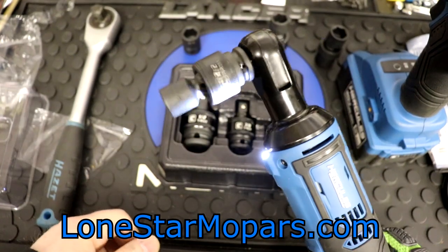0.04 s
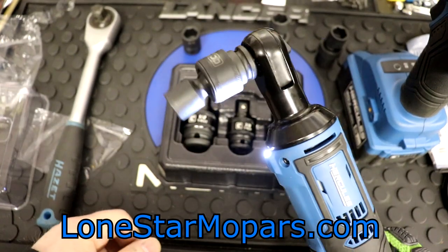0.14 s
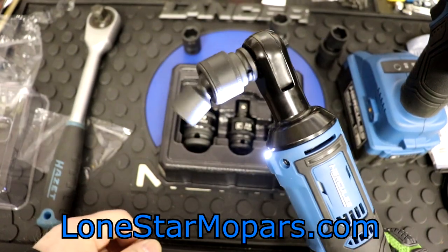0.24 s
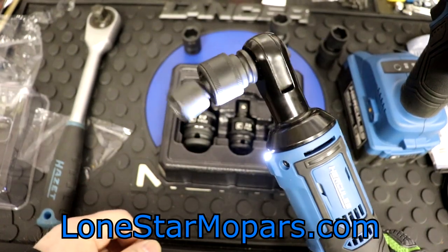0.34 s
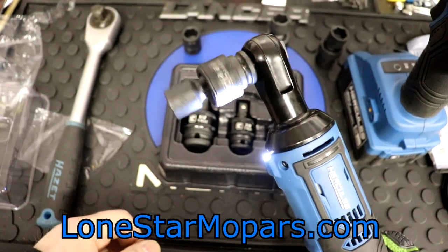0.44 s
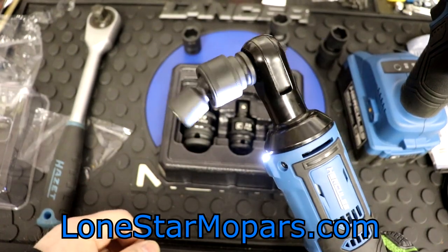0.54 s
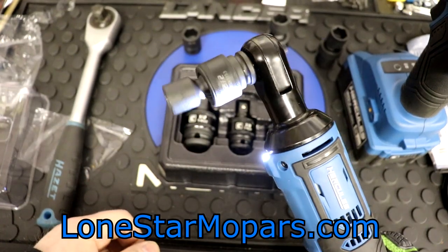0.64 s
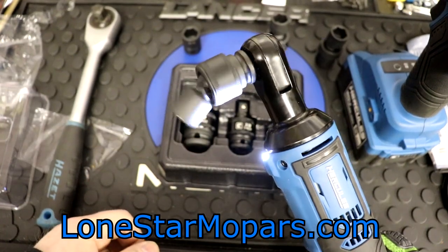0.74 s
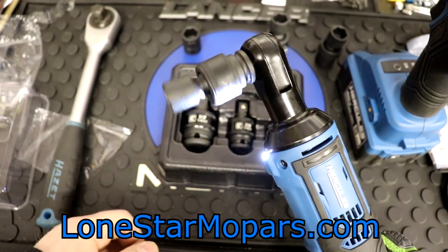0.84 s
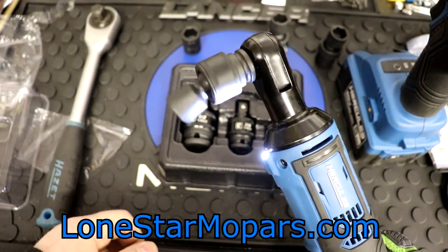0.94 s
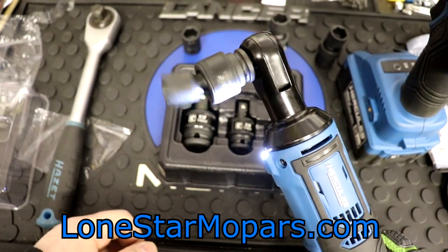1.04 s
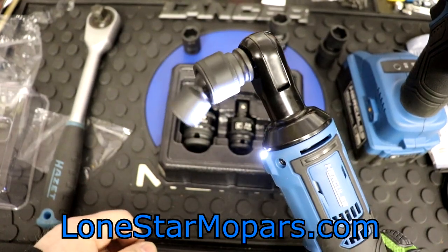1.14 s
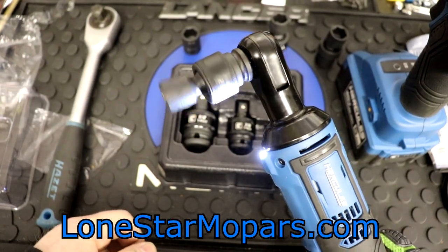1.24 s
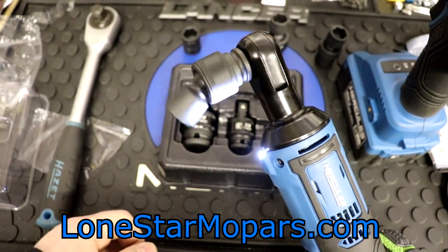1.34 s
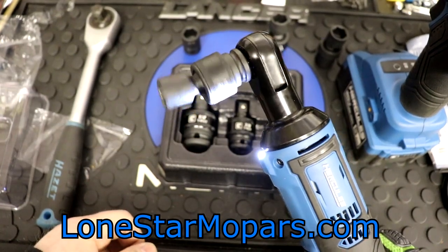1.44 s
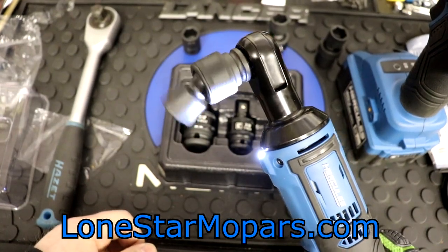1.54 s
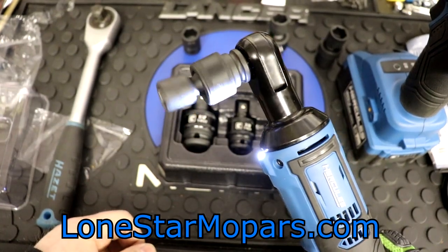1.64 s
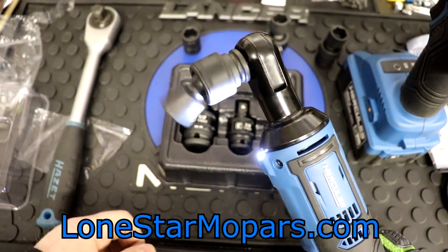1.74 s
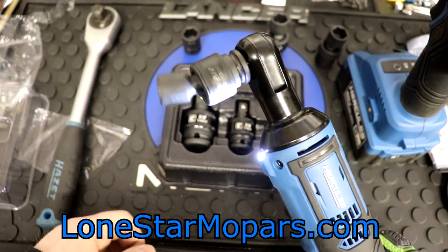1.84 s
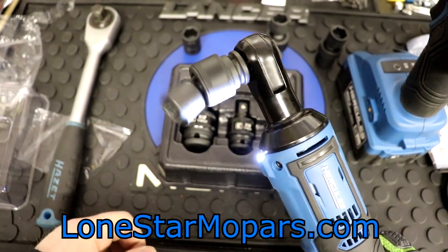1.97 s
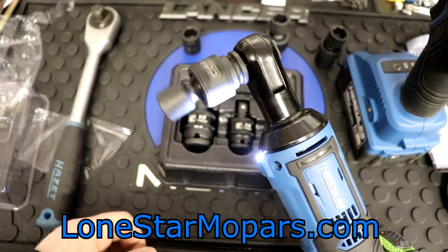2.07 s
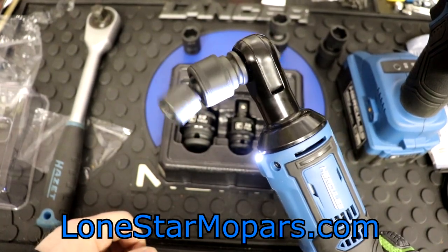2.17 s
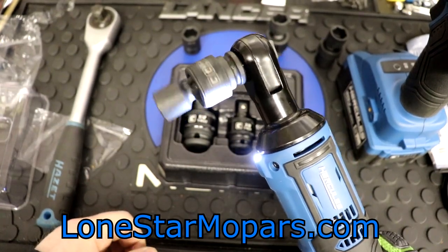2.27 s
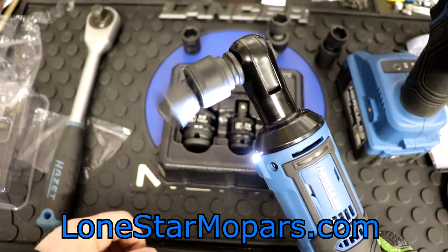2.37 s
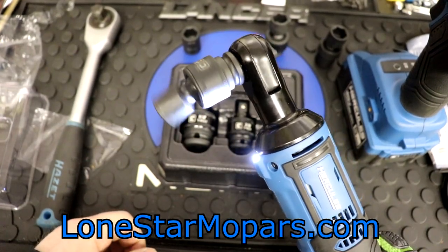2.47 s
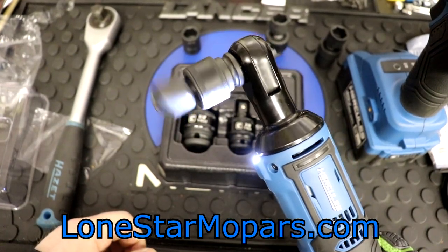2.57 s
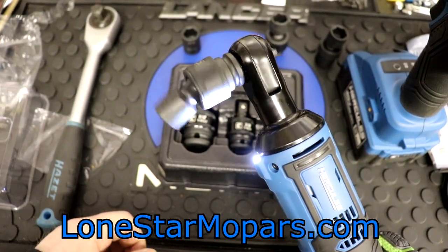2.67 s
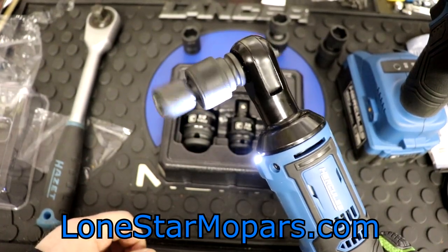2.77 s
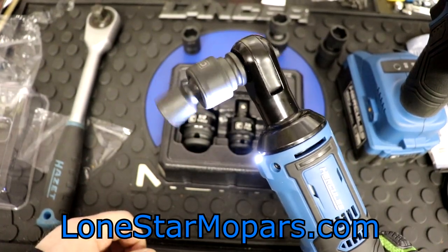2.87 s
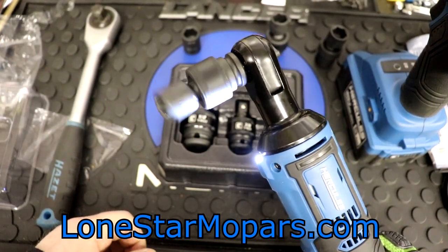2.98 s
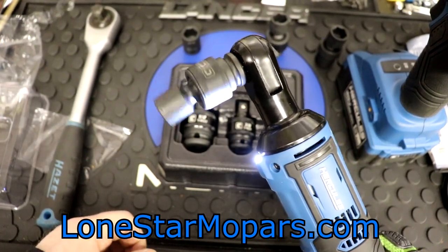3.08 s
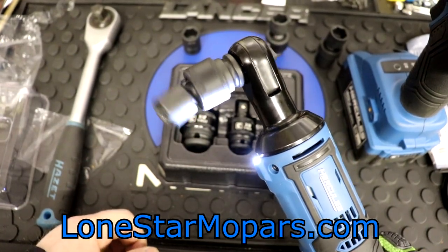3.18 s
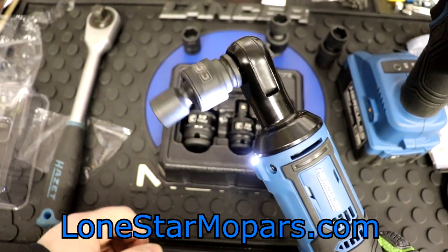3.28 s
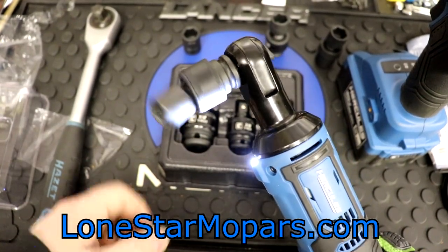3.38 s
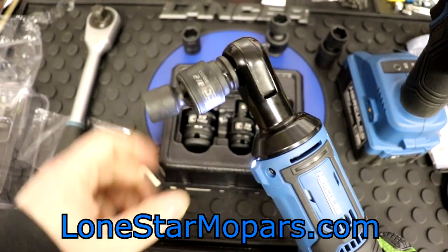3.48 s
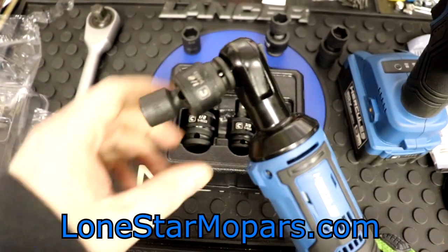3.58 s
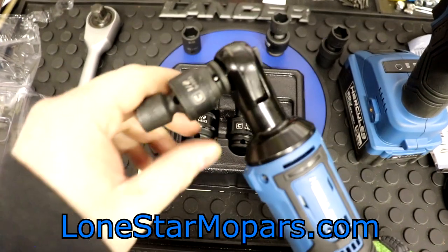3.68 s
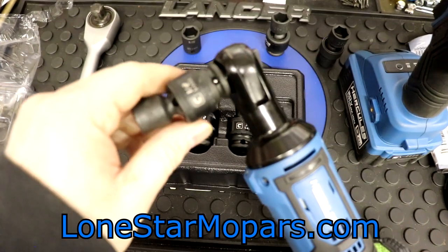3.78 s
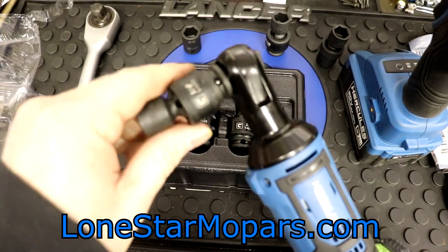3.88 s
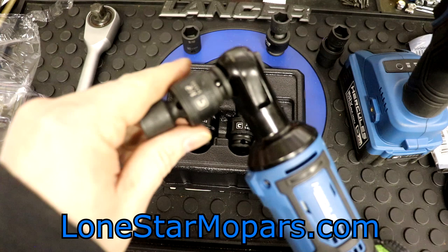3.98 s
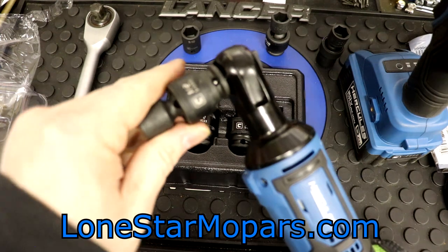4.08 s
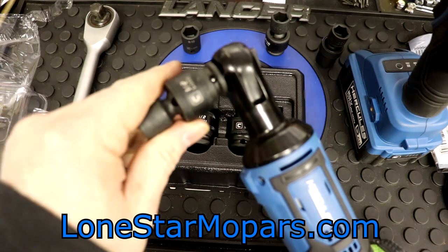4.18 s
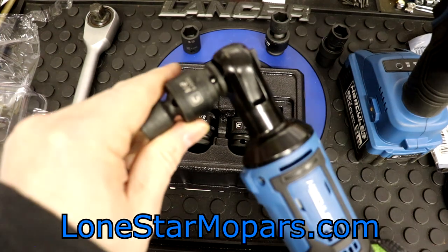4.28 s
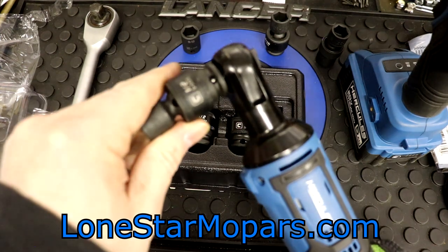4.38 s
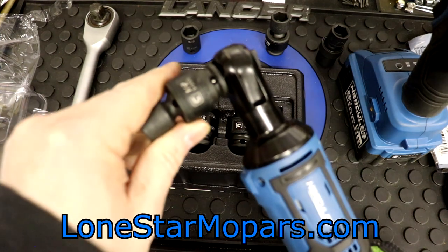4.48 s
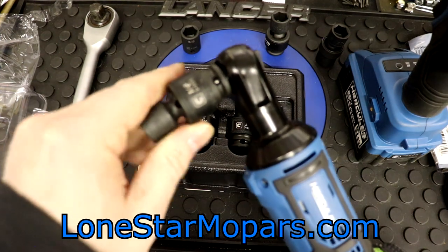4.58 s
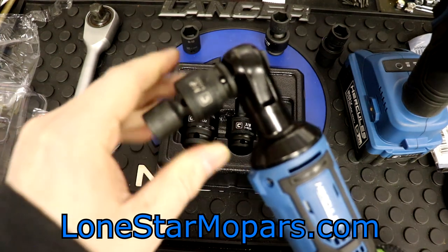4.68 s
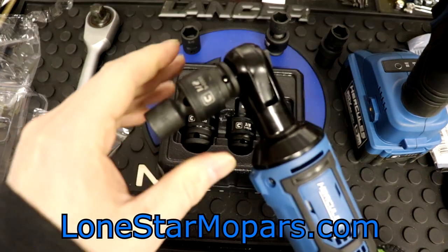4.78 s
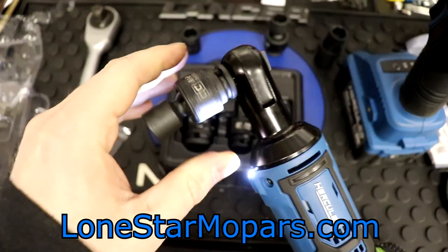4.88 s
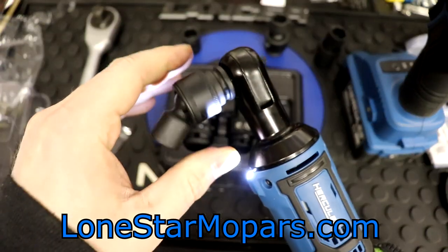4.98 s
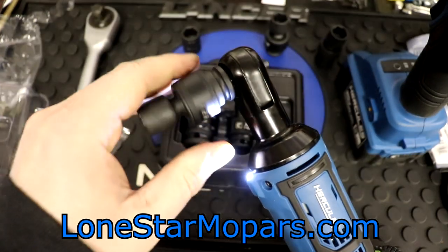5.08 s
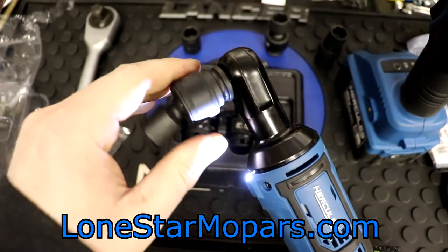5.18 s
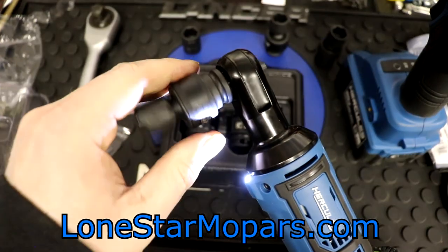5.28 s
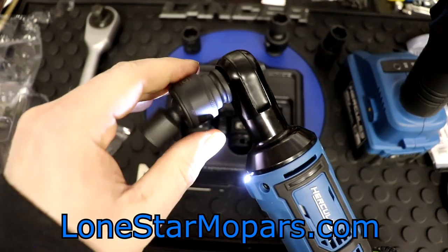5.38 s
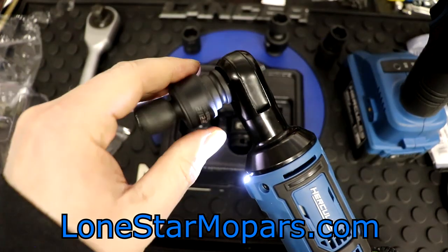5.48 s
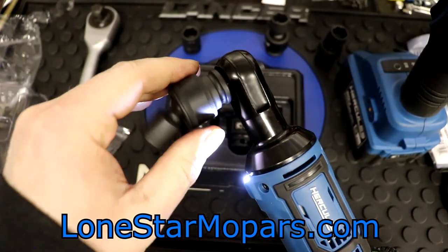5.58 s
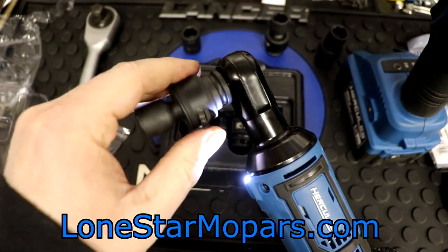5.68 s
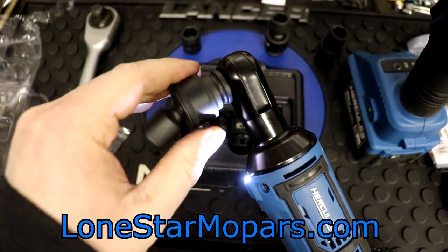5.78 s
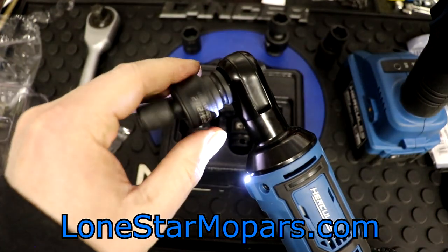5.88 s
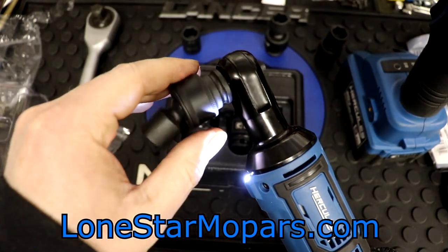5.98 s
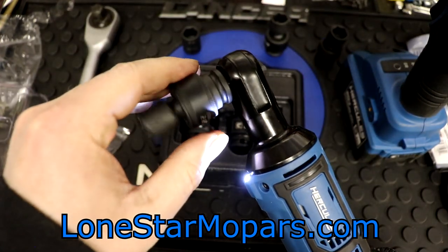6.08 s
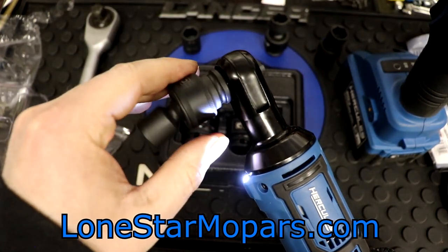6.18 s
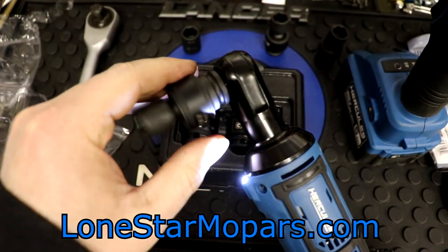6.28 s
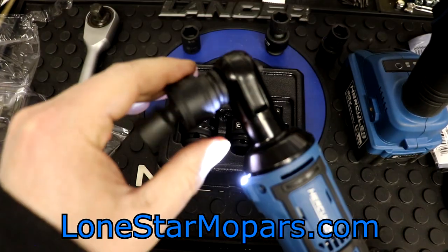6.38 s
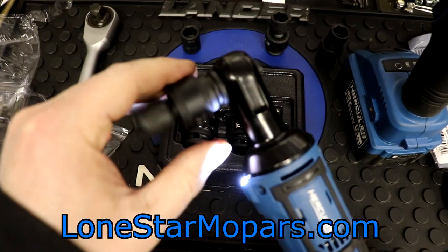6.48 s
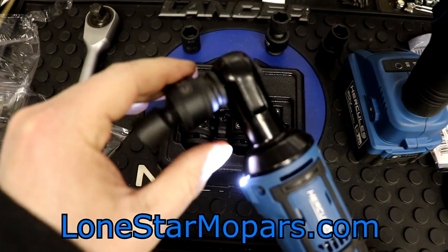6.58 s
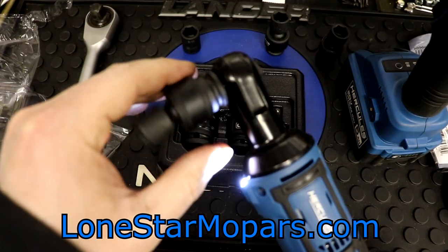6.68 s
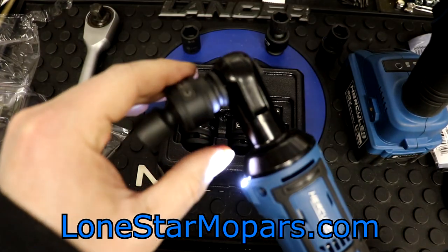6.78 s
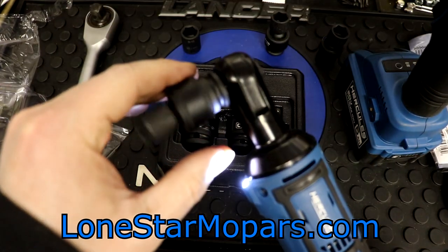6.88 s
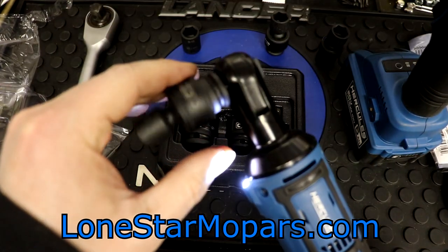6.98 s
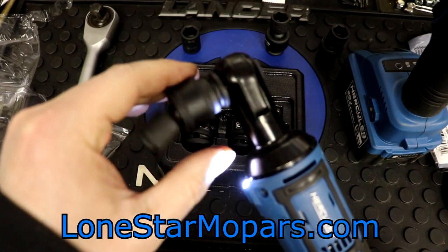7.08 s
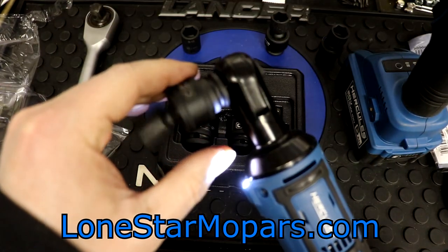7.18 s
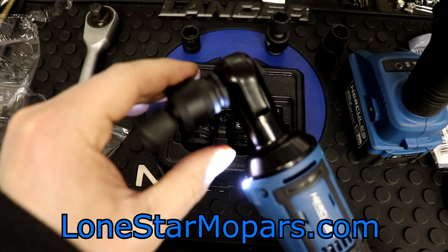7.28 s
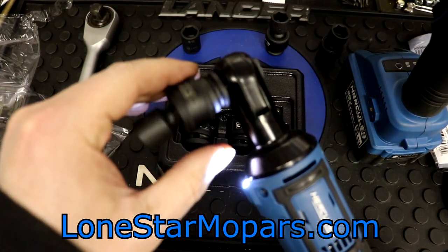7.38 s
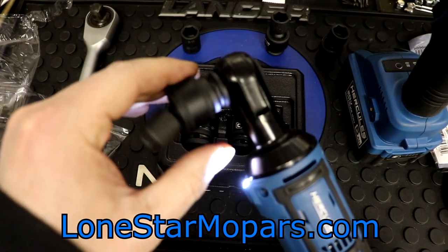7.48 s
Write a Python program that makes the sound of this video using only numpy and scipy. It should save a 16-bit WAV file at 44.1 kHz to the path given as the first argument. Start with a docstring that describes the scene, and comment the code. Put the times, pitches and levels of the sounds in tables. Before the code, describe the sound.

Close up, an electric ratchet whirs and chatters, pauses for a finger rustle and a switch click, then restarts.

```python
"""Above a workbench, close to the microphone, a cordless ratchet spins a socket freely: part throttle,
then full speed, a stop, a rustle of fingers, a flick of the direction lever, and full speed again.
Each crank turn swings the yoke: it knocks, the gears rattle and the pawl ticks over its teeth.
The motor drive whistles at part throttle. Now and then a sharp tick comes with a thump in the
microphone, and a limiter ducks the loudest peaks. A quiet room hums behind."""
import sys
import numpy as np
from scipy import signal
from scipy.fft import rfft, irfft, next_fast_len
from scipy.io import wavfile
from scipy.ndimage import uniform_filter1d

SR = 44100
rng = np.random.default_rng(int(sys.argv[2]) if len(sys.argv) > 2 else 0)


def pcm_store(signal):
    """Save signal as 16-bit PCM."""
    levels = np.round(np.clip(np.atleast_2d(signal), -1, 1) * 32767)
    wavfile.write(sys.argv[1], SR, levels.astype(np.int16).T)


N = 332021
TIME = np.arange(N) / SR
FFT_SIZE = next_fast_len(N + SR)
FREQ = np.maximum(np.arange(FFT_SIZE // 2 + 1) * SR / FFT_SIZE, 1)
PART_THROTTLE = .6  # share of full speed

# Microphone thumps, each with a tick: start_s, left_db, right_db (table levels are relative)
MIC_THUMPS = [(1.0727, -26, -3), (1.5, -38, -20.5), (2.078, -40, -22), (2.237, -22, -9),
              (2.263, -29, -15.5), (2.822, -28, -15), (3.033, -21, -3.5), (3.233, -26, -14),
              (5.064, -31, -13), (5.3596, -19, -19.5), (5.505, -26, -13.5), (5.664, -16, -20.5),
              (5.705, -19.5, -18), (6.26, -40, -24), (6.754, -31, -21), (6.9393, -26, -4),
              (7.471, -33, -21.5)]


def from_db(db):
    """Decibels to gain."""
    return 10 ** (np.asarray(db) / 20)


def rms_one(x):
    """Scale to unit power."""
    return x / np.sqrt(np.mean(x ** 2) + 1e-20)


def over_hz(points):
    """Spread a curve over the frequency grid."""
    hz, value = np.transpose(points)
    return np.interp(np.log(FREQ), np.log(hz), value)


def colour(x, spectrum):
    """Minimum-phase EQ with unit mean power gain, from rows of freq_hz, level_db."""
    cepstrum = irfft(np.log(rms_one(from_db(over_hz(spectrum)))), FFT_SIZE)
    cepstrum[1:FFT_SIZE // 2] *= 2
    cepstrum[FFT_SIZE // 2 + 1:] = 0
    return irfft(rfft(x, FFT_SIZE) * np.exp(rfft(cepstrum)), FFT_SIZE)[..., :N]


def pass_band(x, kind, hz, order=2):
    """Butterworth low-pass or high-pass."""
    return signal.sosfilt(signal.butter(order, hz, kind, fs=SR, output="sos"), x)


def stereo_noise():
    """White noise, narrow in the bass and wide in the treble."""
    # Likeness of left and right: freq_hz, correlation
    likeness = [(100, 0.73), (600, 0.94), (1500, 0.61), (3000, 0.61), (6000, 0.18), (10000, 0.13),
                (15000, 0.36)]
    alike = over_hz(likeness)
    mid, side = rfft(rng.standard_normal((2, FFT_SIZE))) * np.sqrt([(1 + alike) / 2, (1 - alike) / 2])
    return irfft([mid + side, mid - side], FFT_SIZE)[:, :N]


def drift(changes_per_s):
    """A smooth random wander."""
    return np.interp(TIME * changes_per_s, np.arange(SR), rng.standard_normal(SR))


def clicks(times, gains):
    """Single-sample kicks at the given times."""
    out = np.zeros(N)
    np.add.at(out, np.clip(np.round(np.asarray(times) * SR).astype(int), 0, N - 1), gains)
    return out


def fade(kicks, decay_s):
    """Every kick starts an exponential decay."""
    return signal.lfilter([1], [1, -np.exp(-1 / (decay_s * SR))], kicks + 1e-18)


def blows(rows, decay_s, gain_db):
    """Hard contacts, each a noise burst that dies at once."""
    times, level_db = np.transpose(rows)
    return fade(clicks(times, from_db(level_db + gain_db)), decay_s) * stereo_noise()


def resonate(x, hz, width_hz):
    """Two-pole resonance with a peak gain of 1."""
    r, w = np.exp(-np.pi * width_hz / SR), 2 * np.pi * hz / SR
    return signal.lfilter(np.array([1, 0, -1]) * (1 - r * r) / 2, [1, -2 * r * np.cos(w), r * r], x)


def modes(x, table):
    """Resonances in parallel, with alternating signs."""
    return sum((-1) ** k * from_db(db) * resonate(x, hz, width)
               for k, (hz, width, db) in enumerate(table))


def ring(kicks, hz, t60_s):
    """Each kick sets a decaying sine ringing."""
    r, w = np.exp(-np.log(1000) / (t60_s * SR)), 2 * np.pi * hz / SR
    return signal.lfilter([0, np.sin(w)], [1, -2 * r * np.cos(w), r * r], kicks + 1e-18)


def motor(spin_up_s=.02, brake_s=.018, surge_s=.12, socket_revs_per_s=4.98):
    """Each trigger pull spins the motor up with a surge of torque; motion is its share of set speed."""
    # Trigger pulls: on_s, squeeze_s, fully_down_s, standstill_s, socket_tight_spot_s, socket_ring_db
    pulls = [(-.5, .335, .503, 3.576, 0.738, -5.5), (4.8839, 4.922, 4.952, 7.7, 5.21, -2)]
    state = np.zeros((5, N))
    for on_s, squeeze_s, down_s, stop_s, tight_s, ring_db in pulls:
        running = (TIME >= on_s) & (TIME < stop_s)
        t = TIME[running]
        throttle = np.interp(t, [squeeze_s, down_s], [PART_THROTTLE, 1])
        motion = (1 - np.exp((on_s - t) / spin_up_s)) * (1 - np.exp((t - stop_s) / brake_s))
        surge = np.exp((on_s - t) / surge_s)
        revs = socket_revs_per_s * (t - tight_s)
        state[:, running] = [throttle, motion, surge, revs, np.full(len(t), ring_db)]
    return state


def wobble(revs, depth_db, peak_rev):
    """The swivel socket runs out of true, so the load swings once a revolution; in dB."""
    return depth_db * np.cos(2 * np.pi * (revs - peak_rev))


def gears(turns, contacts_per_s, spread_db, contact_s, stroke_spread_db, smooth_share):
    """Loose gears and socket chatter in tiny contacts, hardest just after the yoke turns round."""
    # Rattle through one stroke: turn_fraction, level_db
    stroke_shape = [(0, 0), (.06, 2.5), (.18, 2.5), (.28, 1), (.38, 1.5), (.52, -.5), (.68, -3.5),
                    (.95, -4.5), (1, 0)]
    hits = rng.random(N) < contacts_per_s / SR
    force = from_db(spread_db * rng.standard_normal(N).clip(-2, 2))
    grain = rms_one(fade(hits * force, contact_s))
    stroke_db = stroke_spread_db * rng.standard_normal(int(turns[-1]) + 2)
    swing = from_db(np.interp(turns % 1, *np.transpose(stroke_shape)) + stroke_db[turns.astype(int)])
    return rms_one(np.hypot(grain, smooth_share) * swing) * stereo_noise()


def crank_kicks(turns, turn_fraction, jitter_s, spread_db=4.0):
    """One kick each time the crank passes a point in its turn, uneven in timing and force."""
    times = TIME[1:][np.diff(np.floor(turns - turn_fraction)) > 0]
    late, strength = rng.standard_normal((len(times), 2)).clip(-2, 2).T
    return clicks(times + jitter_s * late, from_db(spread_db * strength))


def yoke(turns, force):
    """The yoke takes up its play with one short knock a stroke, and a few hard clacks."""
    # Hard clacks of the yoke: start_s, level_db
    clacks = [(.0275, -14.5), (.0425, -15), (.2435, -15), (.266, -16), (.411, -14.5), (4.9255, -15)]
    kicks = crank_kicks(turns, turn_fraction=.033, jitter_s=.0004)
    knocks = rms_one(fade(kicks, decay_s=.0058)) * stereo_noise()
    return force * knocks + blows(clacks, decay_s=.0043, gain_db=9.5)


def head(knocks, chatter):
    """Knocks and chatter ring through the housing and head."""
    # Resonances of housing and head: pitch_hz, width_hz, level_db
    head_modes = [(522, 59, -5.5), (616, 202, -11), (1680, 480, -13.5), (2430, 184, -3), (2776, 127, -7),
                  (3240, 205, -2), (4010, 230, -6.5), (4586, 320, -3)]
    return modes(from_db(2.5) * knocks + from_db(6) * chatter, head_modes)


def socket(knocks, chatter):
    """The loose socket jumps on its square drive and rings, mostly at the knocks."""
    # Ring of the socket: pitch_hz, width_hz, level_db
    socket_modes = [(2634, 170, -0.5), (3120, 160, -10.5), (5760, 350, -7.5)]
    return modes(from_db(9) * knocks + from_db(5) * chatter, socket_modes)


def rasp(turns, force):
    """Finer gear contacts blur into a bright rasp."""
    # Tone of the rasp: freq_hz, level_db
    spectrum = [(40, -35), (120, -28), (300, -15), (700, -7.5), (1100, -8.5), (1700, -4), (2800, -2.5),
                (4000, -0.5), (5200, -2.5), (7300, -5.5), (9800, -1), (12000, -1.5), (16000, -14.5)]
    grain = gears(turns, contacts_per_s=1500, spread_db=3.0, contact_s=.00041,
                  stroke_spread_db=1.0, smooth_share=1.0)
    return colour(force * grain, spectrum)


def pawl(turns, force, tick_s=.0014, thump_tick_db=-4.5):
    """The pawl drops over a few teeth each stroke; hard snaps and a tick at each loud thump stand out."""
    # Teeth passed in one stroke: turn_fraction, level_db
    teeth = [(.05, -7), (.27, -6), (.5, -3), (.63, 0), (.77, -6), (.96, -6)]
    # Hard snaps as the crank runs slowly, stops or starts: start_s, level_db
    snaps = [(.0487, 4), (.0715, 2), (.1225, 0), (.145, -4), (.1675, -4), (.19, -4), (.3225, -5),
             (.3465, -2), (3.556, -2), (3.5617, -3), (4.9262, 6), (4.9318, 7), (4.952, 7)]
    # Tone of a tick: freq_hz, level_db
    spectrum = [(500, -32), (3000, -9), (7000, -11), (9500, -13), (11200, -14), (11900, 4), (12600, 4.5),
                (13300, -1), (14500, -3.5), (16000, -10)]
    kicks = sum(from_db(db) * crank_kicks(turns, fraction, jitter_s=.0003) for fraction, db in teeth)
    ticks = force * rms_one(fade(kicks, tick_s)) * stereo_noise()
    thump_ticks = [(start_s, thump_tick_db) for start_s, *_ in MIC_THUMPS]
    return colour(ticks + blows(snaps + thump_ticks, tick_s, gain_db=-8), spectrum)


def gear_whine(strokes_per_s, turns, waver_db=3.5, play_rad=.67, wavers_per_s=22, sweep_per_s2=110):
    """Mesh tones follow the crank, waver with the backlash and swell where the housing resonates."""
    # Gear mesh tones: stroke_rate_multiple, level_db
    mesh_tones = [(4, -2), (7, -5), (8, -8), (9, -7.5), (13.1, 10.5)]
    # How the housing radiates them: freq_hz, gain_db
    housing = [(180, -24.5), (300, -7), (420, 0), (520, 1.5), (600, -3.5), (700, 0.5), (1000, -20)]
    whine = 0
    for multiple, db in mesh_tones:
        housing_db = np.interp(multiple * strokes_per_s, *np.transpose(housing))
        level = from_db(db + housing_db + waver_db * drift(wavers_per_s))
        whine += level * np.sin(2 * np.pi * multiple * turns + play_rad * drift(wavers_per_s))
    sweep = uniform_filter1d(np.gradient(strokes_per_s) * SR, size=SR // 50)
    return whine / (1 + (sweep / sweep_per_s2) ** 2)  # fades while the speed changes


def two_ports(x, lag_s):
    """The right microphone port lies a little farther off, and each port favours other resonances."""
    # Stereo balance: freq_hz, left_minus_right_db
    balance = [(150, -2), (700, 0.5), (3000, -2.5), (4700, 1.5), (5700, -2.5), (9500, 0), (12500, -2.5),
               (15000, -2)]
    gain = from_db(over_hz(balance) * [[.5], [-.5]])
    delay = np.exp(-2j * np.pi * FREQ * [[0], [lag_s]])
    return irfft(rfft(x, FFT_SIZE) * gain * delay, FFT_SIZE)[:, :N]


def ratchet(throttle, motion, surge, revs, ring_db, full_strokes_per_s=75.4):
    """The crank angle times the regular knocks and pawl ticks and swells the gear rattle each stroke."""
    strokes_per_s = full_strokes_per_s * throttle * motion
    turns = np.cumsum(strokes_per_s) / SR
    slow = (1 - throttle) / (1 - PART_THROTTLE)  # 1 at part throttle, 0 at full
    rattle_db = -23.5 + 11 * surge - .6 * slow + wobble(revs, depth_db=.47, peak_rev=.14)
    pawl_db = -26 + 8 * surge + 4 * slow + wobble(revs, depth_db=2.7, peak_rev=.023)
    socket_db = ring_db + wobble(revs, depth_db=2.1, peak_rev=.57)
    force = motion ** 1.24 * from_db(rattle_db)
    chatter = force * gears(turns, contacts_per_s=1400, spread_db=3.5, contact_s=.00079,
                            stroke_spread_db=2.5, smooth_share=.41)
    knocks = yoke(turns, force)
    tool = head(knocks, chatter) + from_db(socket_db) * socket(knocks, chatter)
    # Steep powers of motion: rasp and ticking arrive last and die first.
    tool += rasp(turns, motion ** 2.8 * force)
    tool += pawl(turns, motion ** 7.5 * from_db(pawl_db))
    tool += from_db(-22.5) * force * gear_whine(strokes_per_s, turns)
    return two_ports(tool, lag_s=9e-6)


def drive_whistle(throttle, surge, level_db=-36.5, surge_db=10, right_db=-9, attack_s=.0008):
    """Switched current makes the windings sing until the trigger is fully down, loudest in the surge."""
    # Harmonics of the switching drive: pitch_hz, level_db
    harmonics = [(4973, 4), (9946, -14), (14919, -29)]
    ripple = (throttle * (1 - throttle) / (PART_THROTTLE * (1 - PART_THROTTLE))) ** 2.5
    level = fade(ripple * from_db(level_db + surge_db * surge), attack_s) / (attack_s * SR)
    tone = sum(from_db(db) * np.sin(2 * np.pi * hz * TIME) for hz, db in harmonics)
    return np.sqrt(2) * level * tone * from_db([[0], [right_db]])


def workshop_reverb(x, t60_s, wet_db, wall_hz):
    """The walls return a faint diffuse tail, a little duller than the tool itself."""
    age = TIME[:SR]
    tail = rng.standard_normal((2, SR)) * np.exp(-np.log(1000) * age / t60_s) * (age > .004)
    tail = rms_one(pass_band(tail, "low", wall_hz, order=1)) / np.sqrt(SR)
    return from_db(wet_db) * signal.fftconvolve(x, tail, axes=1)[:, :N]


def room_tone(motion, level_db=-54, running_db=-1.5, drop_at_s=6.96, drop_db=-15):
    """Steady mains hum and dull room noise; the noise dips as the motor runs and drops near the end."""
    # Mains hum: pitch_hz, rms_db
    hum_tones = [(360.7, -63), (479.1, -71), (602.9, -78), (721.4, -67.5), (839.8, -73), (958.2, -78.5),
                 (1082, -79.5)]
    # Tone of the room noise: freq_hz, level_db
    spectrum = [(25, -18.5), (75, -0.5), (120, -6), (220, -5.5), (320, -8.5), (500, -12.5), (800, -17),
                (2000, -20.5), (6000, -25), (16000, -36)]
    hum = sum(np.sqrt(2) * from_db(db) * np.sin(2 * np.pi * hz * TIME) for hz, db in hum_tones)
    level = from_db(level_db + running_db * motion + drop_db * (TIME > drop_at_s))
    return level * colour(stereo_noise(), spectrum) + hum


def mic_thumps(motion, gain_db=8.5, push_s=.00051, settle_hz=79, faint_per_s=2.5, faint_spread_db=3.5):
    """An overloaded capsule is pushed one way, then swings back through its bass cut."""
    times, *sides_db = np.transpose(MIC_THUMPS)
    loud = np.array([clicks(times, from_db(db)) for db in sides_db])
    # Faint thumps fall at random while the motor runs, leaning right.
    hits = rng.random(N) < motion * faint_per_s / SR
    faint = hits * from_db(faint_spread_db * rng.standard_normal(N).clip(-2, 1) + [[-38], [-33]])
    push = pass_band(fade(from_db(gain_db) * (loud + faint), push_s), "low", hz=900, order=1)
    return pass_band(push, "high", settle_hz)


def fingers(touch_s=.0048, relative_width=.42, soft_hz=6000):
    """The hand rustles, and each touch shifts the damped socket: a dry burst around one pitch."""
    # The hand takes and loosens its grip: middle_s, level_db, half_length_s
    rustles = [(3.78, -54, 0.16), (4.767, -52.5, 0.26)]
    # Tone of the rustle: freq_hz, level_db
    spectrum = [(60, -6), (300, 0.5), (800, -3), (1200, -7), (2200, -10), (5000, -24), (16000, -38)]
    # Fingers on the socket: start_s, level_db, pitch_hz
    grips = [(3.723, -34, 300), (3.832, -38, 400), (3.881, -30.5, 2480), (3.892, -36, 3550),
             (3.906, -34, 1690), (3.909, -30.5, 450), (3.921, -31.5, 700), (4.633, -32, 850),
             (4.816, -37, 3400)]
    grain = stereo_noise()
    swell = sum(from_db(db) * np.exp(-((TIME - mid_s) / half_s) ** 2) for mid_s, db, half_s in rustles)
    touches = 0
    for start_s, db, hz in grips:
        burst = fade(clicks([start_s], from_db(db)), touch_s) * grain
        touches += resonate(burst, hz, hz * relative_width) * np.sqrt(SR / hz / 10)
    return swell * colour(grain, spectrum) + pass_band(touches, "low", soft_hz)


def direction_lever():
    """The lever flicks over with a short crack and a dry ring of the plastic body."""
    # It leaves one stop and hits the other: start_s, level_db
    stops = [(4.648, -31), (4.652, -17)]
    # Ring of the plastic body: pitch_hz, level_db, t60_s
    body_modes = [(700, -7, .016), (850, -5, .024), (1340, -7, .016), (2283, -10, .019), (2850, -12, .014),
                  (4200, -11, .01), (5938, -17, .01)]
    times, level_db = np.transpose(stops)
    kicks = clicks(times, from_db(level_db))
    body = sum((-1) ** k * from_db(db) * ring(kicks, hz, t60_s)
               for k, (hz, db, t60_s) in enumerate(body_modes))
    crack = blows(stops, decay_s=.003, gain_db=-3)
    return body + pass_band(crack, "low", hz=6400)


def scene():
    """The tool close up, its room, and the thumps in the microphone."""
    throttle, motion, surge, revs, ring_db = motor()
    tool = ratchet(throttle, motion, surge, revs, ring_db) + drive_whistle(throttle, surge)
    tool += fingers() + direction_lever()
    reverb = workshop_reverb(tool, t60_s=.42, wet_db=-16.5, wall_hz=11870)
    return tool + reverb + room_tone(motion) + mic_thumps(motion)


def limiter(x, threshold_db, release_db_per_s, attack_s):
    """Peaks over the threshold pull the gain down; it recovers at a steady rate."""
    over_db = np.maximum(20 * np.log10(np.abs(x).max(axis=0) + 1e-9) - threshold_db, 0)
    held_db = np.maximum.accumulate(over_db + release_db_per_s * TIME) - release_db_per_s * TIME
    return x * from_db(-fade(held_db, attack_s) / (attack_s * SR))


def record(dry):
    """Limiter, full-scale clipping and a steep top cut."""
    limited = limiter(dry, threshold_db=-2.1, release_db_per_s=55, attack_s=.014)
    top_cut = signal.ellip(10, .1, 70, 15900, fs=SR, output="sos")
    return signal.sosfilt(top_cut, np.clip(limited, -1, 1))


dry = scene()
out = record(dry)
pcm_store(out)
```